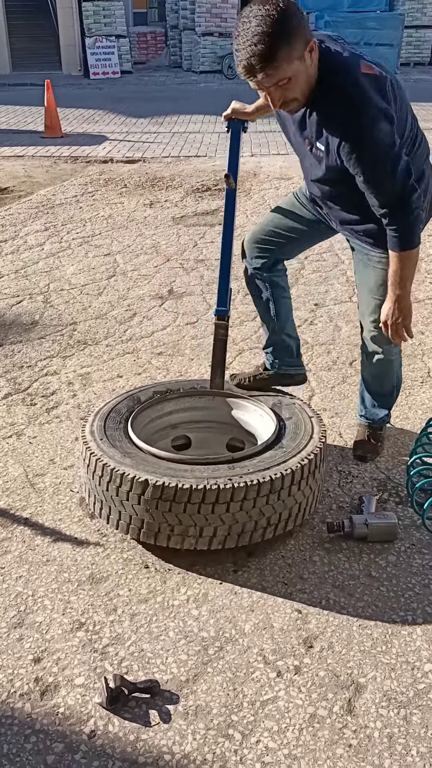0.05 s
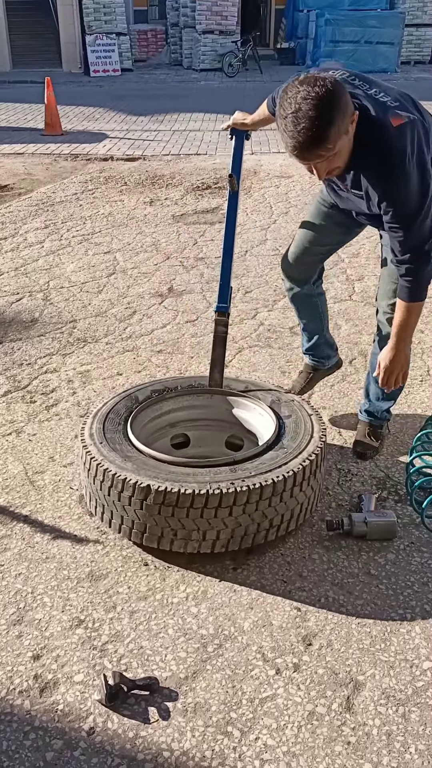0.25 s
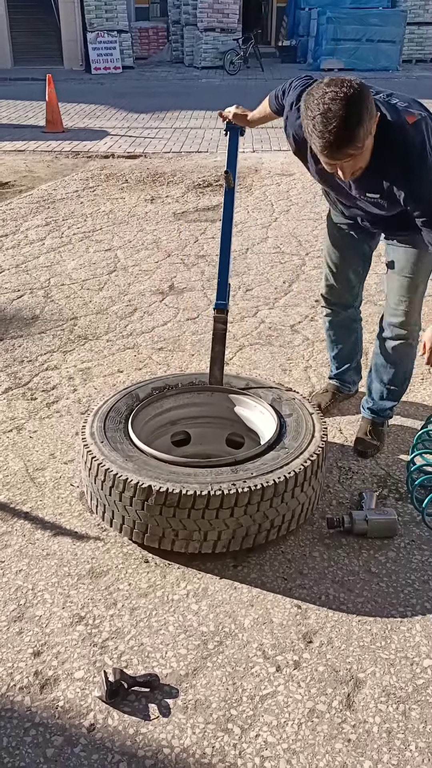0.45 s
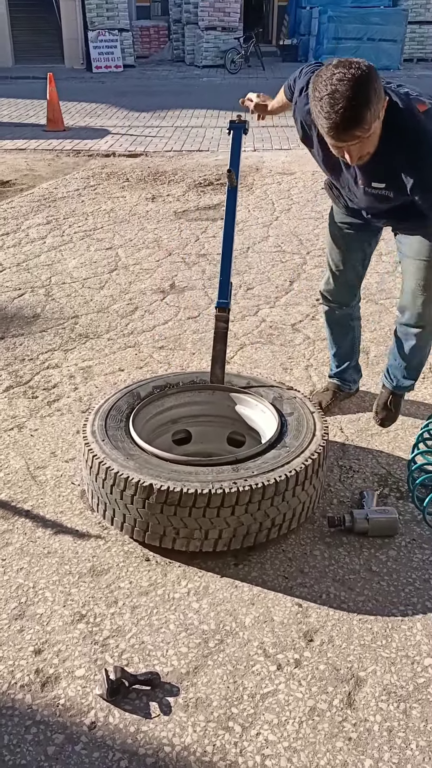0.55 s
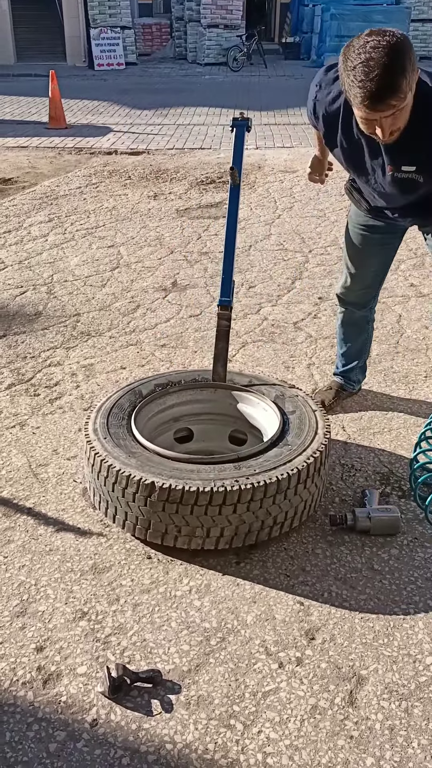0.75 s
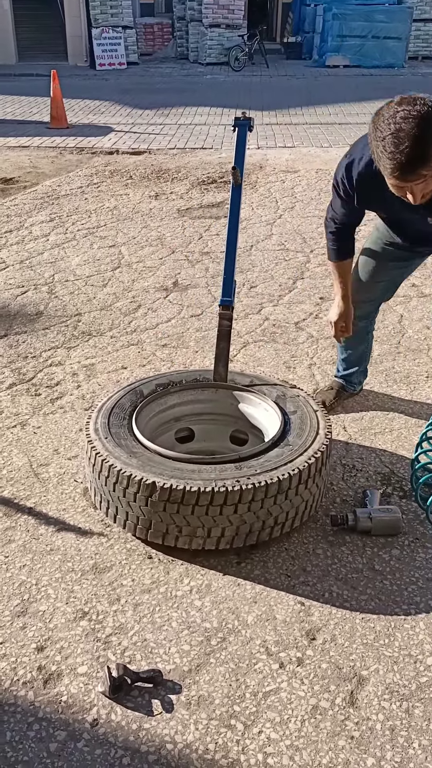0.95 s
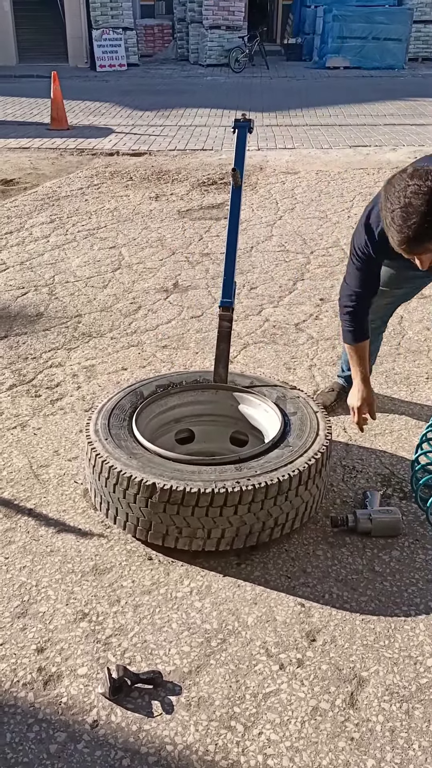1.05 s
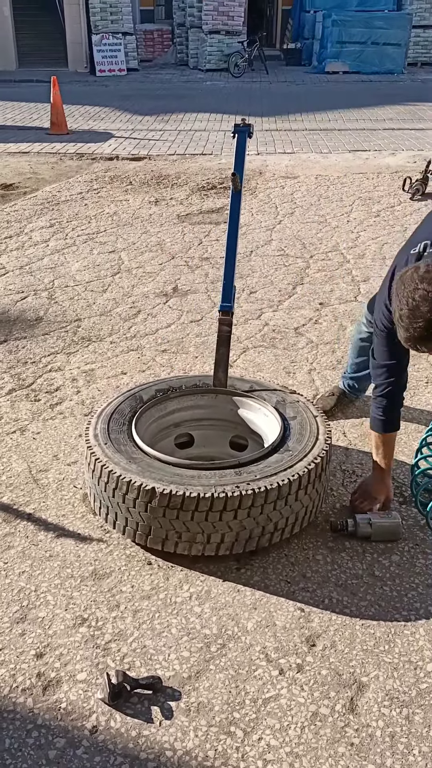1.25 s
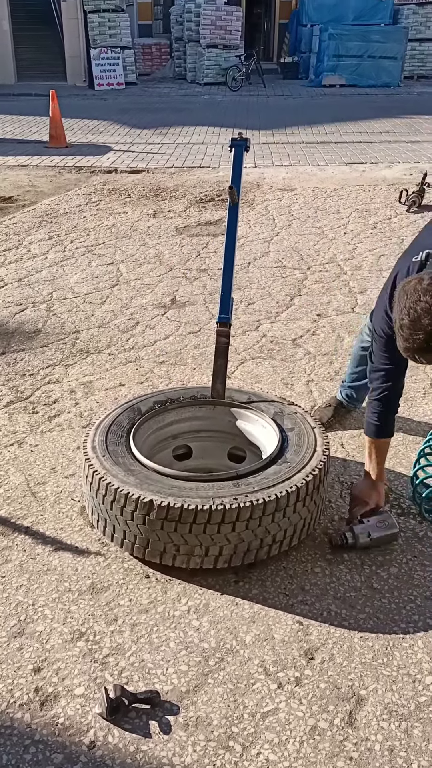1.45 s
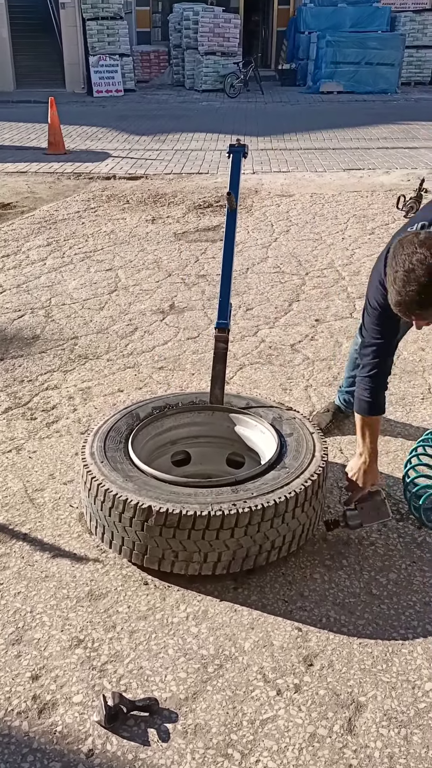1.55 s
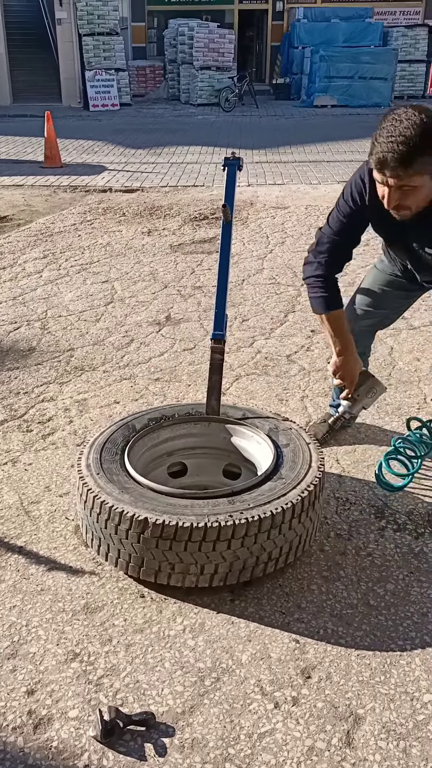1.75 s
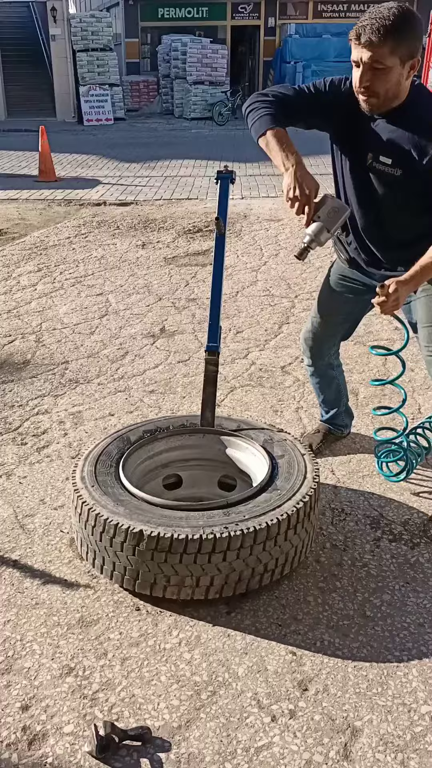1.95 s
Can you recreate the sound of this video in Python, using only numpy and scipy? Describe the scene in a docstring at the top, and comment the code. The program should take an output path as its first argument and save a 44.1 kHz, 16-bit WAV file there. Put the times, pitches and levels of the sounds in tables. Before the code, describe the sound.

A heavy tyre thuds and briefly rebounds as a steel bar clanks against its rim. Shoes scuff on grit, then a metal wrench scrapes and clinks as it is picked up nearby on a quiet paved street.

```python
"""Truck wheel, steel bar and wrench

A steel bar jolts a truck wheel lying on a paved street: the tyre thuds and rebounds, bar and rim clank.
Shoes scuff on grit, then a metal impact wrench scrapes, clinks and jingles as it is picked up.
House fronts throw the contacts back over a quiet town hum."""
import sys
import numpy as np
from scipy import signal
from scipy.fft import rfft, irfft
from scipy.io import wavfile

SR = 44100
rng = np.random.default_rng(int(sys.argv[2]) if len(sys.argv) > 2 else 0)


def store_pcm(level_fs):
    """Save levels as 16-bit WAV."""
    pcm = np.round(np.clip(level_fs, -1, 1) * 32767).astype(np.int16)
    wavfile.write(sys.argv[1], SR, np.atleast_2d(pcm).T)


N = 88200
T = np.arange(N) / SR
HZ = np.maximum(np.fft.rfftfreq(N, 1 / SR), 1)
TOWN_WIDE_HZ, ECHO_WIDE_HZ, CONTACT_WIDE_HZ = 756, 430, 1900  # noise opens into stereo above these

# Echo off the house fronts. Each row: frequency in Hz, t60 (time to fade 60 dB) in seconds.
STREET_DECAY = [(100, 0.51), (400, .68), (1000, 0.77), (2500, 0.59), (6000, 0.44), (13000, 0.29)]
# Far traffic. Each row: frequency in Hz, relative level in dB.
TRAFFIC_SPECTRUM = [(15, -53), (25, -54), (48, 1.5), (142, -15.5), (176, -7.5), (213, -6), (301, -12),
                    (415, -15), (515, -12), (769, -20), (1090, -25), (1910, -28.5), (2370, -22.5),
                    (2780, -28), (15000, -41)]
# Low ringing hum, already sounding at the start and fading away. Each row: centre in Hz, width in Hz, level in
# dB before the fader.
DRONE_BANDS = [(57, 9.5, -64), (184.8, 7.5, -58.5), (295, 12, -67), (491, 24, -63)]
# The hum's fader. Each row: time in seconds, gain in dB.
DRONE_FADER = [(0, 11), (.2, 7), (.6, 4.5), (.9, 3.5), (1.3, -12), (2, -7)]

# Soles landing. Each row: start in seconds, level in dB, rise and t60 in seconds.
FOOTFALLS = [(0.955, -39, 0.011, 0.25), (1.006, -50, 0.0066, 0.22), (1.327, -53, 0.0064, 0.4),
             (1.635, -38, 0.0025, 0.3)]
# A sole's dull bump. Each row: frequency in Hz, relative level in dB.
SOLE_SPECTRUM = [(50, -10), (100, 0), (145, 4), (230, 4), (340, 3), (480, -9), (700, -10.5), (1100, -19),
                 (1500, -13.5), (5000, -57)]
# Grit dragged under shoes and tyre.
# Each row: start in seconds, level in dB, rise and t60 in seconds, tilt in dB per octave.
GRIT_SCUFFS = [(0.0, -47, 0.025, 3.03, 1), (0.13, -40.5, 0.056, 0.15, 6.5),
               (0.245, -42.5, 0.0082, 0.067, 11), (0.543, -51, 0.014, 0.068, 7),
               (0.956, -42, 0.011, 0.77, -0.5), (1.335, -48.5, .02, 0.14, 2.5),
               (1.44, -47.5, 0.069, 0.47, 0), (1.98, -40.5, 0.015, .1, 6.5)]
# Sandy rasp. Each row: frequency in Hz, relative level in dB.
SCUFF_SPECTRUM = [(200, 12.5), (700, -4), (1150, 2), (1600, -3), (2600, 2.5), (4000, -10), (6000, -12),
                  (9000, -24.5), (13000, -16), (15500, -50)]
# The wrench dragged over paving. Each row: start in seconds, level in dB, rise and t60 in seconds.
HOUSING_DRAGS = [(1.424, -45, 0.037, 0.31), (1.5, -37, 0.0017, 0.16), (1.538, -36, 0.0051, 0.18)]
# Its hollow housing. Each row: frequency in Hz, relative level in dB.
HOUSING_SPECTRUM = [(60, -33), (180, -16), (240, -2), (310, 3), (400, -3), (480, -0.5), (620, -11),
                    (850, -14), (1400, -19), (5000, -30)]

# Shakes of a small loose part of the wrench. Each row: start in seconds, level in dB.
JINGLE_HITS = [(1.535, -33), (1.563, -29), (1.684, -29), (1.706, -28)]
# That part's shimmer. Each row: frequency in Hz, relative level in dB, t60 in seconds.
LOOSE_PART_MODES = [(13400, -7, .09), (13100, 2, 0.18), (13270, -8, 0.11), (13740, -9, .12),
                    (13800, -3, .19), (13700, -3, 0.18), (13850, -5, 0.11)]
# The wrench skidding on paving.
# Each row: start in seconds, level in dB, rise and t60 in seconds, tilt in dB per octave.
WRENCH_SKIDS = [(1.4563, -41.5, 0.00091, 0.02, -4), (1.476, -44, .001, 0.018, 4),
                (1.5009, -29.5, .001, 0.014, -6.5), (1.5344, -22, 0.0019, 0.052, -1.5),
                (1.558, -34.5, .003, 0.1, -3), (1.6317, -10, .0018, .025, 1),
                (1.6482, -23, 0.0016, 0.014, 0), (1.6832, -25.5, 0.0025, .022, 6),
                (1.6975, -21, 0.00082, 0.013, 6), (1.7035, -14.5, 0.00088, 0.022, 12),
                (1.722, -40.5, 0.0045, 0.048, -2.5), (1.9181, -35, .0005, 0.0075, 3.5)]
# A skid's gritty bite. Each row: frequency in Hz, relative level in dB.
SKID_SPECTRUM = [(100, -27), (350, -12), (800, -14), (1200, -5), (1560, -10.5), (2200, -1.5), (2800, 2.5),
                 (3500, -2.5), (4200, -7.5), (4900, -13), (5600, -2), (6200, -5.5), (7000, -10.5),
                 (8800, -10.5), (9700, -12), (11000, -8), (13500, -11), (15000, -41)]
# The wrench's metal ring. Each row: frequency in Hz, relative level in dB, t60 in seconds.
TOOL_MODES = [(554, -21, 0.033), (1180, -25, 0.021), (2410, -32, 0.3), (2980, -41, .15), (2940, -26, 0.071),
              (3430, -17, 0.04), (3930, -25, .04), (5900, -29, 0.056), (6120, -26, 0.034), (8800, -40, .03)]

# Bar hits rim. Each row: start in seconds, ring and crack levels in dB, crack tilt in dB per octave.
BAR_HITS = [(0.2020, -14, -17, 1), (0.2222, -7, -14.5, -1.5), (0.2382, -4, -21.5, -1), (0.272, -11, -28, 1)]
# The crack of that contact. Each row: frequency in Hz, relative level in dB.
CRACK_SPECTRUM = [(100, -3), (550, 11.5), (850, -14.5), (1240, -5.5), (1500, -10), (1850, -7), (2300, 8.5),
                  (2800, -4), (3400, -4), (4500, -21), (6000, -19.5), (8000, -37), (14000, -36)]
# Bar and rim ringing. Each row: frequency in Hz, relative level in dB, t60 in seconds.
BAR_RIM_MODES = [(1916, -38, 0.11), (2072, -28, 0.11), (2137, -19.5, 0.11), (2178, -26, 0.23),
                 (2358, -16, 0.1), (2480, -24.5, 0.15), (2560, -30, .18), (2630, -23.5, 0.23),
                 (2690, -30, 0.17), (2890, -30, 0.13), (3100, -48, 0.091), (3360, -31, 0.25)]
# Faint ping as the bar is let go. Each row: frequency in Hz, level in dB, t60 in seconds.
RELEASE_MODES = [(12200, -49, 0.075), (12270, -47, .09)]

# Blows on the tyre. Each row: time in seconds, level in dB, contact time in milliseconds.
TYRE_BLOWS = [(0.2034, -42, 0.84), (0.2226, 3, 0.71), (0.2322, -2.5, 0.5), (0.3017, -5, 1.2),
              (0.362, -11, 0.95), (0.4137, -9, 0.95), (0.482, -24, 2)]
# Casing and enclosed air. Each row: frequency in Hz, relative level in dB, t60 in seconds.
CASING_MODES = [(77, -22, 0.11), (111, -24.5, 0.14), (145, -26, 0.11), (189, -24.5, 0.34),
                (209.7, -27.5, 0.46), (232.3, -12.5, 0.096), (290.6, -17.5, 0.11), (319, -29, 0.36),
                (378.7, -23, 0.2), (409.3, -25.5, 0.3), (449, -18, 0.16), (498, -24, .18),
                (551.8, -33.5, 0.22), (690, -49, .12)]
# The wheel rebounding. Each row: start in seconds, level in dB, pitch in Hz, rise and t60 in seconds.
SIDEWALL_BOUNCES = [(0.2214, -10, 118, 0.021, 0.1), (0.287, -21, 110.1, 0.017, 0.26),
                    (0.366, -22, 111, 0.011, 0.28), (0.4133, -19, 120, 0.017, 0.097),
                    (0.478, -33.5, 123.6, 0.012, 0.27), (0.572, -36.5, 115.7, 0.019, 0.13)]


def amp(db):
    """Decibels to gain."""
    return 10 ** (np.asarray(db) / 20)


def along(points, hz):
    """Read (Hz, value) points on a log-frequency axis."""
    freqs, values = np.array(points, float).T
    return np.interp(np.log(hz), np.log(freqs), values)


def noise(gain, wide_hz=CONTACT_WIDE_HZ):
    """Stereo noise of rms 1 with the given spectrum; left and right part ways above wide_hz."""
    mid, side = rfft(rng.standard_normal((2, N)))
    x = irfft(gain * (mid + side * np.array([[1], [-1]]) * HZ / np.hypot(HZ, wide_hz)), N)
    return x / x.std()


def colour(points, tilt_db=0):
    """An EQ curve as gains, tipped by tilt_db per octave above 500 Hz."""
    return amp(along(points, HZ) + tilt_db * np.log2(np.maximum(HZ, 500) / 500))


def swell(start, rise, t60):
    """Linear rise, exponential fall."""
    age = T - start
    return np.clip(age / rise, 0, 1) * np.exp(-np.log(1000) * np.maximum(age - rise, 0) / t60)


def ring(modes, start, scatter):
    """Decaying modes from a start time; scatter gives each its own phase at each ear."""
    age = np.maximum(T - start, 0)
    phases = scatter * rng.uniform(-np.pi, np.pi, (len(modes), 2, 1))
    out = 0
    for (hz, db, t60), phase in zip(modes, phases):
        out += amp(db) * np.exp(-np.log(1000) * age / t60) * np.sin(2 * np.pi * hz * age + phase)
    return out * (T >= start)


def detuned(modes, share):
    """Every contact loads the metal differently and shifts its modes a little."""
    return [(hz * (1 + share * rng.standard_normal()), db, t60) for hz, db, t60 in modes]


def pan(x, pan_db):
    """Set the left side pan_db louder than the right."""
    return x * amp(np.array([[pan_db], [-pan_db]]) / 2)


def street(x, pan_db, echo_db):
    """Place a sound and add the diffuse echo of the house fronts, whose treble dies first."""
    hiss, tail = rfft(noise(1, ECHO_WIDE_HZ)), 0
    for centre, t60 in STREET_DECAY:
        band = along([(hz, hz == centre) for hz, _ in STREET_DECAY], HZ)
        tail += irfft(hiss * band, N) * swell(start=0.011, rise=0.0027, t60=t60)
    tail /= np.sqrt(np.sum(tail ** 2) / 2)
    echo = signal.fftconvolve(x, tail, axes=1)[:, :N]
    return pan(x + amp(echo_db) * echo, pan_db)


def town():
    """The bed: steady far traffic and a low ringing hum that fades away."""
    traffic = amp(-50.5) * noise(colour(TRAFFIC_SPECTRUM), TOWN_WIDE_HZ)
    drone = 0
    for hz, width, db in DRONE_BANDS:
        resonance = 1 / (1 + (2 * (HZ - hz) / width) ** 2)
        drone += amp(db) * noise(resonance, TOWN_WIDE_HZ)
    fader = amp(np.interp(T, *np.array(DRONE_FADER).T))
    return pan(traffic + drone * fader, pan_db=-0.5)


def rumbles(spectrum, contacts):
    """Dull contacts that share one body: a single noise swells at each."""
    envelope = sum(amp(db) * swell(start, rise, t60) for start, db, rise, t60 in contacts)
    return noise(colour(spectrum)) * envelope


def paving():
    """Sandy scuffs, footfalls and the hollow scrape of the dragged housing."""
    scuffs = 0
    for start, db, rise, t60, tilt_db in GRIT_SCUFFS:
        scuffs += amp(db) * noise(colour(SCUFF_SPECTRUM, tilt_db)) * swell(start, rise, t60)
    steps = rumbles(SOLE_SPECTRUM, FOOTFALLS)
    drags = rumbles(HOUSING_SPECTRUM, HOUSING_DRAGS)
    return street(scuffs + steps + drags, pan_db=3.5, echo_db=-5)


def jingle():
    """Close high modes beat against each other and flutter as the loose part rattles."""
    knots = np.arange(0, T[-1] + 1, 1 / 70)  # a new level 70 times a second
    flutter_db = np.interp(T, knots, rng.uniform(-6.4, 4, len(knots)))
    shimmer = 0
    for start, db in JINGLE_HITS:
        shimmer += amp(db) * ring(detuned(LOOSE_PART_MODES, share=0.006), start, scatter=0.96)
    return street(shimmer * amp(flutter_db), pan_db=9.5, echo_db=-9.5)


def wrench():
    """Brief gritty skids ring the tool; sharper contacts favour its high modes."""
    clinks = 0
    for start, db, rise, t60, tilt_db in WRENCH_SKIDS:
        skid = noise(colour(SKID_SPECTRUM, tilt_db)) * swell(start, rise, t60)
        modes = [(hz, level + tilt_db * np.log2(hz / 5000), fade) for hz, level, fade in TOOL_MODES]
        metal = amp(-2) * ring(modes, start + rise, scatter=0.84)
        clinks += amp(db) * (skid + metal)
    return street(clinks, pan_db=5, echo_db=-8)


def bar():
    """Steel on steel: each hit is a short crack and a cluster of damped rings; a faint ping follows."""
    ping = ring(RELEASE_MODES, start=0.642, scatter=0.56)
    clanks = 0
    for start, ring_db, crack_db, tilt_db in BAR_HITS:
        crack = noise(colour(CRACK_SPECTRUM, tilt_db)) * swell(start, rise=0.0013, t60=0.094)
        steel = ring(detuned(BAR_RIM_MODES, share=0.012), start, scatter=0.94)
        clanks += amp(crack_db) * crack + amp(ring_db) * steel
    return street(clanks + ping, pan_db=4.5, echo_db=-6)


def sidewall():
    """The wheel bounces on its sidewall: each boom is a dry low tone with a softer octave."""
    booms = 0
    for start, db, hz, rise, t60 in SIDEWALL_BOUNCES:
        phase = 2 * np.pi * hz * (T - start)
        tone = np.sin(phase) + amp(-9.5) * np.sin(2 * phase)
        booms += amp(db) * swell(start, rise, t60) * tone
    return booms


def tyre():
    """Each soft blow rings the casing and the air inside; a longer contact gives a duller thud."""
    blows = 0
    for time, db, contact_ms in TYRE_BLOWS:
        push = np.exp(-(2 * (T - time) * 1000 / contact_ms) ** 2)
        blows += amp(db) * push / push.sum()
    casing = ring(CASING_MODES, start=0, scatter=0.22)
    thuds = signal.fftconvolve(blows[None], casing, axes=1)[:, :N]
    radiation = signal.butter(2, 86.5, "high", fs=SR, output="sos")  # the casing sheds little deep bass
    return street(signal.sosfilt(radiation, thuds), pan_db=0.5, echo_db=-7.5)


def scene():
    """The wheel and bar lead the mix; everything else reaches the left ear a touch late."""
    wheel = tyre() + sidewall() + bar()
    left, right = wrench() + jingle() + paving() + town()
    lag_s = 0.2796e-3
    return wheel + np.array([np.interp(T - lag_s, T, left), right])


def record(dry):
    """Trim the deep bass and the very top from the mix."""
    low_cut = signal.butter(4, 45.4, "high", fs=SR, output="sos")
    high_cut = signal.ellip(8, 0.2, 80, 15300, fs=SR, output="sos")
    return signal.sosfilt(high_cut, signal.sosfilt(low_cut, dry))


dry = scene()
out = record(dry)
store_pcm(out)
```